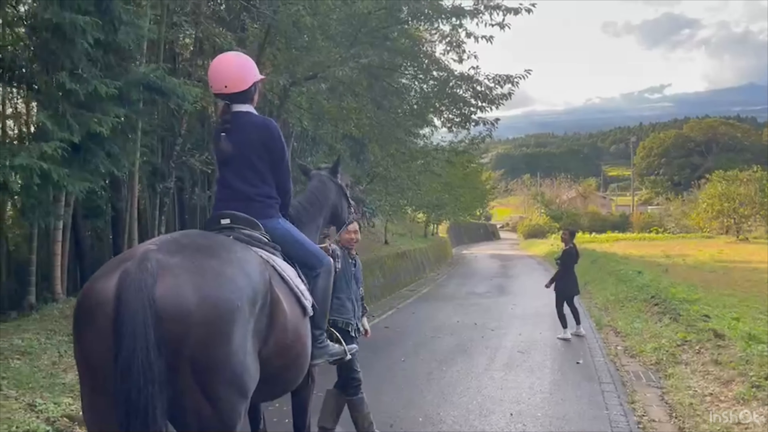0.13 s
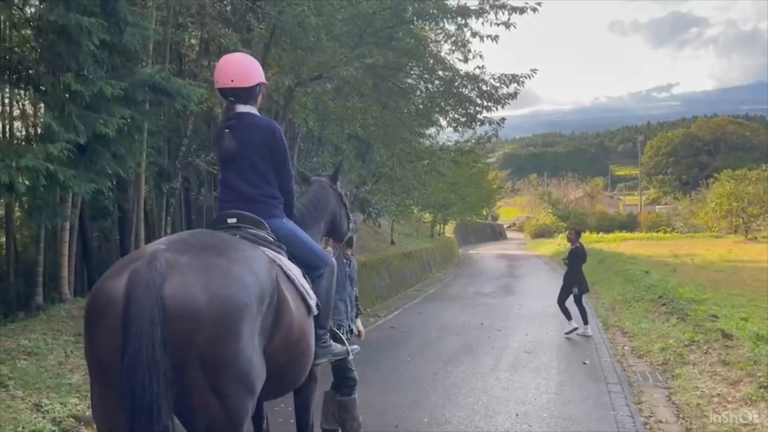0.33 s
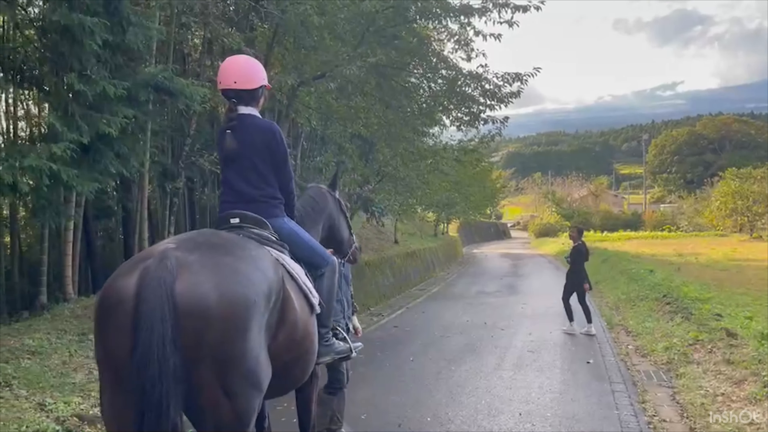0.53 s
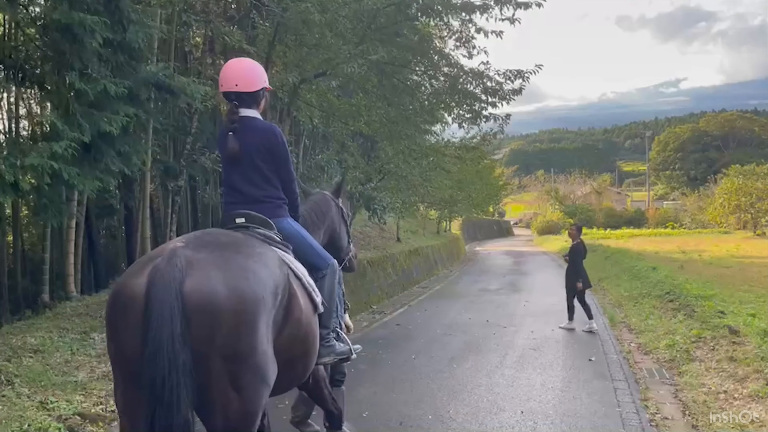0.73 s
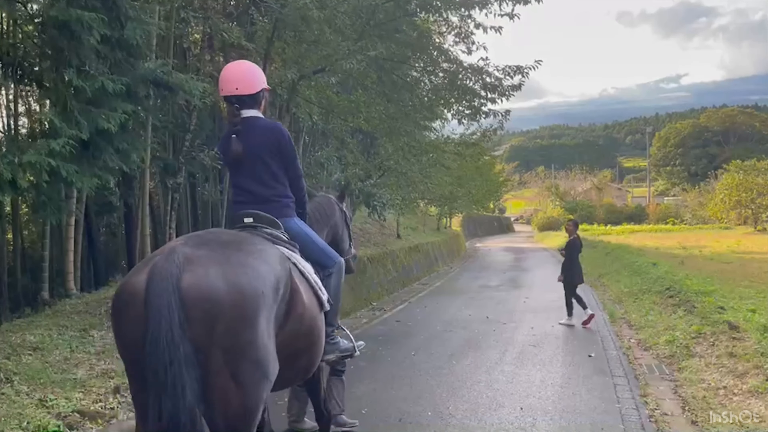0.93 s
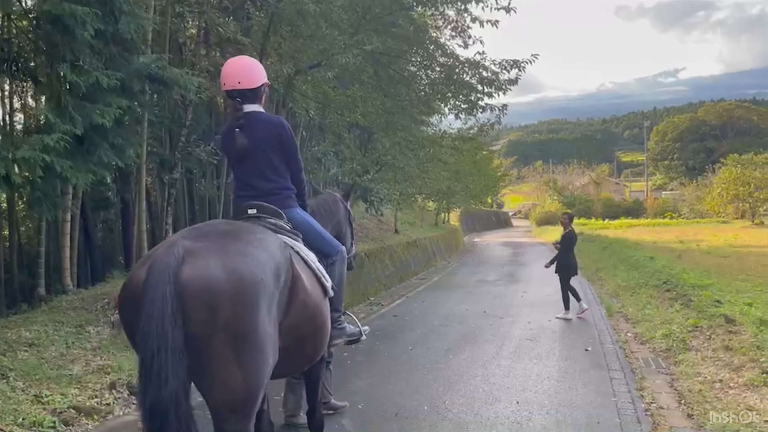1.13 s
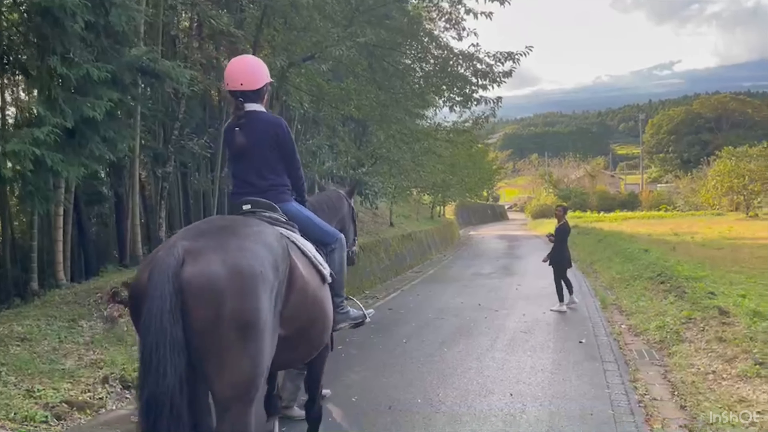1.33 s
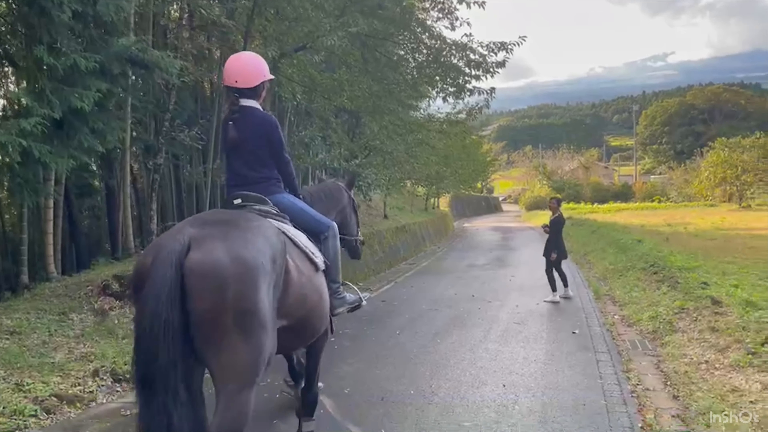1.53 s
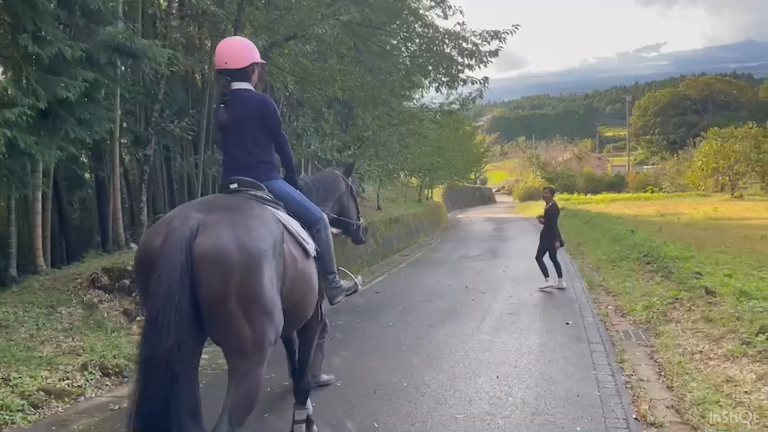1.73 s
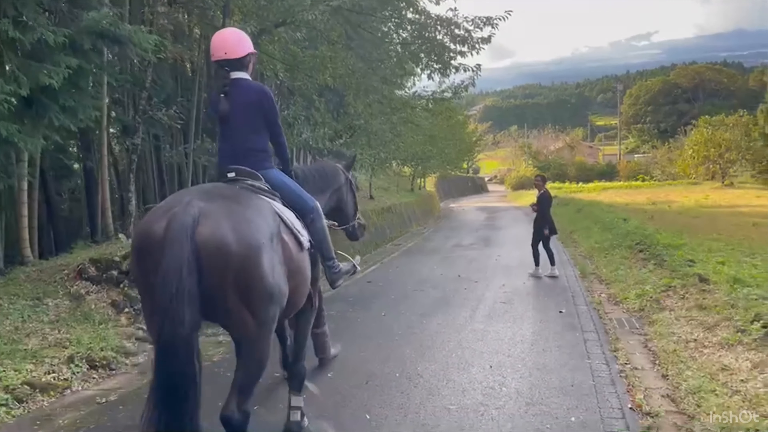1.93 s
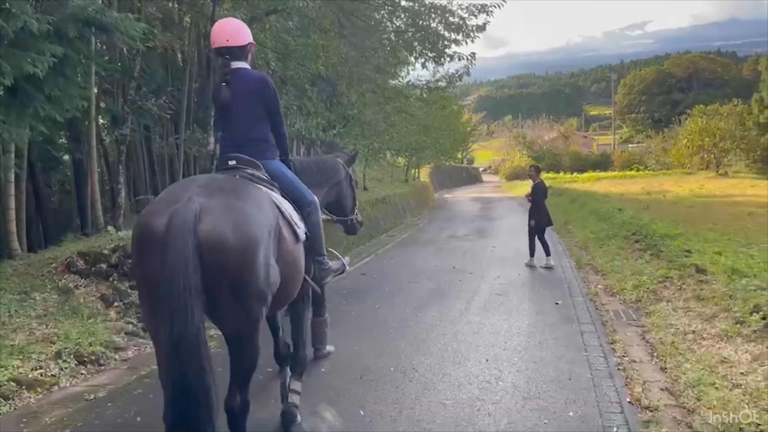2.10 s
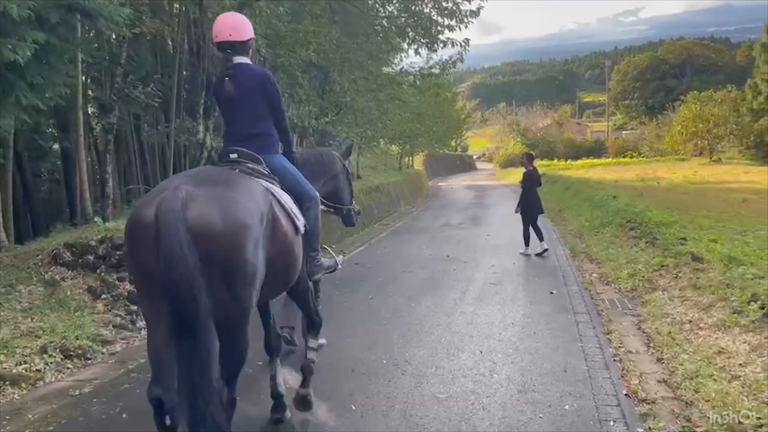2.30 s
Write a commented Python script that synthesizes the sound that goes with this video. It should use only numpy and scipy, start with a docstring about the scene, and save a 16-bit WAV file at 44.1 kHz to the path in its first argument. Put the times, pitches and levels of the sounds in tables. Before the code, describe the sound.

A shod horse walks on a wet paved road just ahead, slightly left: soft scuffs, then strong hollow clops, gritty clicks and a double-edged step; quiet low hum, thin birdlike whistle, close stereo microphone outdoors.

```python
"""Shod horse on a wet road

A horse walks a few metres ahead and left. Each hoof edge sums decaying clop modes, a sinking thud, a shoe snap,
crack and ring, and splash noise. Grit ticks are sines with noise; sole scuffs are grainy shaped noise.
A metal ring, thin chirp and airy two-strand whistle are tones blurred by narrow noise. Country hum, of
third-octave noise bands, runs throughout; a faint echo from trees follows the near sounds.
"""
import sys
import numpy as np
from scipy import signal
from scipy.fft import rfft, irfft
from scipy.io import wavfile
from scipy.ndimage import uniform_filter1d

SR = 44100
rng = np.random.default_rng(int(sys.argv[2]) if len(sys.argv) > 2 else 0)


def wav_out(sig):
    """Save sig, one row per channel (or a flat mono array), as 16-bit PCM at SR to the path in sys.argv[1]."""
    wavfile.write(sys.argv[1], SR, np.round(np.clip(np.atleast_2d(sig).T, -1, 1) * 32767).astype(np.int16))


def invert_db(level):
    """Linear amplitude ratio for a level in decibels (20 dB per decade), elementwise."""
    return 10 ** (np.asarray(level, dtype=float) / 20)


N = 104120
SIDES = np.array([[1], [-1]])  # left, right


def on_log(table, hz):
    """Interpolates a (frequency [Hz], value) table on a log frequency axis."""
    a = np.array(table, float)
    return np.interp(np.log(np.maximum(hz, 1)), np.log(a[:, 0]), a[:, 1])


def unit(x):
    """Scales to rms 1."""
    return x / np.sqrt(np.mean(x ** 2))


def shaped(gain):
    """Noise whose spectrum follows gain(Hz), rms 1."""
    spectrum = rfft(rng.standard_normal(N))
    return unit(irfft(spectrum * gain(np.fft.rfftfreq(N, 1 / SR)), N))


def bell(hz, width_hz):
    """Resonance curve as a function of frequency."""
    return lambda f: 1 / np.sqrt(1 + (2 * (f - hz) / width_hz) ** 4)


def walk(rate_hz):
    """Random levels held 1 / rate_hz s and slewed twice."""
    k = int(SR / rate_hz)
    held = np.repeat(rng.standard_normal(N // k + 1), k)
    return 1.94 * uniform_filter1d(uniform_filter1d(held, k), k)[:N]


def swell(t, rise_s, order=1):
    """Push that peaks after rise_s and dies away; a higher order starts softer."""
    u = np.maximum(t, 0) / rise_s
    return (u * np.exp(1 - u)) ** order


def add(out, at_s, x, pan_db):
    """Mixes a sound in at a time, left over right by pan_db."""
    i = int(at_s * SR)
    x = x[:N - i]
    out[:, i:i + len(x)] += x * invert_db(pan_db / 2 * SIDES)


def airy(width_hz):
    """Complex narrow noise about 0 Hz: turns a tone breathy when it modulates it."""
    return shaped(bell(0, width_hz)) + 1j * shaped(bell(0, width_hz))


def glide(table, carrier):
    """Moves a carrier along a (time [s], pitch [Hz], level [dB]) table with a wavering pitch."""
    t = np.arange(N) / SR
    s, hz, db = np.array(table).T
    waver_hz = 22 * walk(40)
    phase = 2 * np.pi * np.cumsum(np.interp(t, s, hz) + waver_hz) / SR
    level = invert_db(np.interp(t, s, db, left=-150, right=-150))
    return level * np.real(carrier * np.exp(1j * phase))


# swells of four hum ranges, used re the first row:
# (time [s], bass [dB], middle [dB], treble [dB], top [dB])
HUM_SWELLS = [(0.0, -54.5, -64, -77, -92.5), (0.18, -54.5, -59, -80, -95.5), (0.39, -59, -58.5, -77, -104),
              (0.52, -53.5, -60.5, -74, -99), (0.64, -57, -56.5, -78, -92.5),
              (0.83, -53.5, -57, -81.5, -103), (1.11, -57.5, -57, -79, -102),
              (1.43, -55.5, -55.5, -76.5, -99), (1.59, -56, -52.5, -77, -94),
              (1.71, -55, -50.5, -73.5, -98), (1.81, -51.5, -50.5, -71.5, -89),
              (2.02, -55.5, -50.5, -74.5, -94), (2.24, -54, -51, -70, -90), (2.36, -55.5, -54, -76.5, -96)]
# hum spectrum before trim: (frequency [Hz], density [dB per Hz])
HUM_SPECTRUM = [(25, -55), (45, -11.5), (66, 1.5), (99, -10), (156, -8), (281, -25), (509, -29),
                (1200, -31), (2060, -36), (3090, -35.5), (5730, -42), (7500, -58), (9000, -42.5),
                (12500, -54.5), (14000, -51), (16000, -62)]
# (frequency [Hz], likeness of the channels [0-1])
HUM_LIKENESS = [(30, .78), (120, .8), (300, .85), (1500, .6), (3000, .55), (6000, .9), (8000, .98),
                (12000, .98)]


def hum():
    """Distant hum and leaves: third-octave noise bands; bass, middle, treble and top swell on their own."""
    t, out = np.arange(N) / SR, 0
    s, *levels = np.array(HUM_SWELLS).T
    swells_db = np.array([np.interp(t, s, v) for v in levels])
    swells_db = swells_db - swells_db[:, :1]
    corners = np.log([120, 400, 1800, 3600, 6500, 10000])  # Hz, crossfades between ranges
    for hz in 28 * 2 ** (np.arange(28) / 3):
        share = np.array([np.interp(np.log(hz), corners, row[[0, 1, 1, 2, 2, 3]]) for row in np.eye(4)])
        band_db = on_log(HUM_SPECTRUM, hz) + 10 * np.log10(hz) - 75.5
        db = share @ swells_db + band_db + 1.98 * walk(7.946)
        alike = on_log(HUM_LIKENESS, hz)
        mid, side = (shaped(bell(hz, hz / 4)) for _ in range(2))
        stereo = np.sqrt(1 + alike) * mid + np.sqrt(1 - alike) * side * SIDES
        out = out + invert_db(db) * stereo * invert_db(0.8 * share[1] * SIDES)  # middle leans left
    return out


# (frequency at 0 s [Hz], level at 0 s [dB], t60 [s])
RING_MODES = [(3930, -79, 1.6), (4690, -73, 1.6), (5880, -75, 1.5), (7020, -79, 1.2)]


def metal_ring():
    """Fading metal modes, slightly noisy, sagging in pitch and stopped by stop_s."""
    t, out = np.arange(N) / SR, 0
    sag_per_s, stop_s = 0.1, 0.23
    damped = np.clip((stop_s - t) / 0.03, 0, 1)
    for hz, db, t60_s in RING_MODES:
        phase = 2 * np.pi * hz * (t - sag_per_s * t ** 2 / 2)
        mode = np.real((1 + 0.65 * airy(110)) * np.exp(1j * phase))
        out = out + invert_db(db - 60 * t / t60_s) * damped * mode
    return out


# (time [s], pitch [Hz], level [dB])
CHIRP_GLIDE = [(.25, 3150, -82), (.26, 3240, -66), (.28, 3500, -67), (.305, 3700, -62), (.326, 3670, -57),
               (.343, 3480, -59), (.354, 3180, -61), (.362, 3080, -85)]


def chirp():
    """Thin chirp: a gliding tone with a little narrow noise."""
    return glide(CHIRP_GLIDE, 1.1 + 0.42 * airy(300))


# grit, splash and shoe-nail ticks, level and treble before trim:
# (time [s], level [dB], frequency [Hz], treble re tick [dB], decay scale [ms])
GRIT_TICKS = [(0.349, -46, 3670, -10.5, 5.1), (0.3693, -42, 3680, -1, 4.7), (0.378, -42, 3770, -1, 3.5),
              (0.4454, -45, 3500, -11, 7.6), (0.6583, -38.5, 3770, -16, 3.3), (0.818, -53, 3460, -7, 6.4),
              (0.839, -55.5, 5100, 15, 4), (1.041, -71, 3270, 10, 2.4), (1.225, -35, 3240, -14.5, 6.7),
              (1.246, -41, 4920, -26, 3.5), (1.2624, -46, 3360, -17, 4.5), (1.5098, -44, 3420, -10, 2.5),
              (1.5587, -45, 3230, 1, 1.4), (1.6812, -35, 4040, -25, 3.6), (1.7502, -24.5, 5020, -40, 2.4),
              (1.7856, -17, 5110, -36, 3), (1.8448, -36.5, 4750, -14, 2.2), (1.9032, -30, 5100, -24.5, 2.4),
              (2.2816, -34, 3530, -23, 5.3)]


def grit():
    """Ticks of grit, water and shoe nails: short sines with two bands of noise."""
    out, t = np.zeros((2, N)), np.arange(2048) / SR
    top, wide = shaped(bell(10000, 6700)), shaped(bell(6700, 3300))
    for at_s, db, hz, top_db, decay_ms in GRIT_TICKS:
        i = int(at_s * SR)
        x = np.sin(2 * np.pi * hz * t)
        x += 0.5 * np.roll(wide, -i)[:len(t)]
        x += invert_db(top_db + 8.5) * np.roll(top, -i)[:len(t)]
        add(out, at_s, invert_db(db - 15.5) * swell(t, decay_ms / 3000) * x, pan_db=1.0)
    return out


# (start [s], length [s], level [dB])
SOLE_SCUFFS = [(0.358, 0.04, -53), (0.437, 0.19, -57), (0.657, 0.033, -77), (0.817, 0.046, -65.5),
               (0.861, 0.0089, -55), (0.897, 0.026, -53.5), (0.931, 0.017, -58), (1.082, 0.069, -67.5),
               (1.218, 0.042, -64.5), (1.597, 0.067, -65), (2.083, 0.054, -64), (2.223, 0.069, -68.5)]
# scuff spectrum, relative: (frequency [Hz], density [dB per Hz])
SCUFF_SPECTRUM = [(880, -49), (1500, -46), (1620, -33), (1920, 0), (3180, 9), (3990, 7), (5890, 11.5),
                  (11000, 6.5), (15500, -5)]


def scuffs():
    """Soles rub the road: shaped noise with a grainy random level under a rounded window."""
    out = np.zeros((2, N))
    rub = shaped(lambda f: invert_db(on_log(SCUFF_SPECTRUM, f)))
    rub = unit(rub * invert_db(1.55 * walk(250)))
    for at_s, length_s, db in SOLE_SCUFFS:
        n = int(length_s * SR)
        window = np.sqrt(np.hanning(n))
        add(out, at_s, invert_db(db) * window * rub[int(at_s * SR):][:n], pan_db=0.7)
    return out


# hoof contacts; crack and treble are base values that each layer offsets:
# (time [s], clop level [dB], clop [Hz], thud re clop [dB], settled thud [Hz], crack base re clop [dB],
# loudest shoe ring [Hz], treble base re clop [dB], left over right [dB], clop rise [ms])
HOOF_CONTACTS = [(0.458, -46.5, 1020, 2, 188, -11, 2220, -28, 2.5, 2.8),
                 (0.619, -49.5, 523, 3.5, 227, -5, 2740, -13, 3.5, 0.94),
                 (0.759, -60, 1030, -3, 328, -17, 2050, -34, 2.0, 2.8),
                 (0.872, -18.5, 1005, -7.5, 354, -11, 2324, -19.5, 2.5, 2.23),
                 (0.896, -37.5, 700, -31, 434, -14, 2520, -38, 3, 2.0),
                 (0.901, -31, 750, -10, 204, -10, 3470, -32, 2.5, 1.3),
                 (0.91, -30.5, 982, -30, 174, -9, 2400, -38, 3.5, 4.03),
                 (0.904, -35, 1090, -3, 489, -8.5, 2230, -34, 7, 2),
                 (0.917, -41, 967, -10, 208, -12, 2370, -31, -3, 2.2),
                 (0.942, -42, 990, 0, 166, -6, 2050, -19, 2, 0.8),
                 (0.949, -40, 960, -29, 446, -14, 3640, -10.5, 8.5, 1.31),
                 (0.956, -43.5, 764, 2, 279, -15, 2230, -40, 1.5, 1.95),
                 (1.072, -35.5, 730, -14, 269, -3, 2110, -1, 5, 0.78),
                 (1.23, -30, 937, -50, 443, -13.5, 2500, -22, 6.5, 1.01),
                 (1.237, -41, 1170, -34, 254, -5.5, 2400, -11, 6, 1.7),
                 (1.328, -17, 1050, -10, 252, -13.5, 2460, -47, 4.5, 1.28),
                 (1.3528, -18.5, 670, -34, 440, -18, 2170, -50, 4.5, 1.13),
                 (1.358, -28.5, 750, -6.5, 235, -29, 2080, -50, -1, 2.58),
                 (1.633, -44.5, 974, -6, 247, -14.5, 2000, -33, 4, 1.4),
                 (1.646, -40.5, 1070, -27, 402, -23, 2000, -46, 1, 2.9),
                 (1.655, -27, 724, -14, 280, -36, 2240, -52, 1.5, 2.53),
                 (1.66, -29, 900, -16, 342, -22, 1880, -55, 7, 2.53),
                 (1.673, -28, 706, -36, 437, -23.5, 2060, -49, 6, 2.4),
                 (1.68, -35.5, 430, 3.5, 214, -20, 2530, -36, 1.5, 1.62),
                 (1.7, -44, 670, -26, 172, -8, 2030, -44, 3, 2.6),
                 (1.727, -46.5, 670, 3, 370, -33, 3900, -40, -6, 2.35),
                 (1.749, -26.5, 1163, -1, 218, -21, 2800, -22, 4.5, 1.04),
                 (1.785, -29, 824, 2.5, 252, -14, 3250, -26, 4, 1.67),
                 (1.848, -48.5, 597, 8, 244, -12.5, 4540, -19, 2, 2.5),
                 (2.083, -24.5, 804, -19, 313, -13, 3550, -34, -1, 1.45),
                 (2.0865, -27.5, 1040, -12, 281, -13.5, 2360, -40, 6, 2.1),
                 (2.0955, -26, 740, -8, 251.7, -13.5, 2350, -42, 8.5, 1.82),
                 (2.1095, -27, 780, -13, 222, -16, 4350, -42, -2.5, 1.43),
                 (2.327, -72, 584, -7, 190, -15, 2380, -13, -9, 2.6)]
# noisy shoe resonances: (frequency [Hz], width [Hz], relative level [dB])
SHOE_MODES = [(2350, 550, 6), (3360, 690, -11), (4520, 710, 0.5), (5100, 250, 4), (6760, 420, -4)]


def hooves():
    """Three hollow modes clop, a late thud sinks in pitch, the shoe snaps, cracks and rings, water splashes."""
    lead_s = 0.002  # clop begins this long before contact
    out, t = np.zeros((2, N)), np.arange(4096) / SR - lead_s
    shoe = [invert_db(db) * shaped(bell(hz, width_hz)) for hz, width_hz, db in SHOE_MODES]
    wide, top, body = shaped(bell(1800, 5600)), shaped(bell(8350, 5000)), shaped(bell(620, 860))
    upper_ratio, upper_db, lower_ratio, lower_db = 1.222, -14, 0.654, -7
    thud_late_s, thud_rise_s, thud_glide, thud_glide_s = 0.0015, 0.0036, 1.1, 0.003
    snap_s = 0.00014
    late = t - 0.0002  # the shoe sounds just after contact

    for at_s, db, hz, thud_db, thud_hz, crack_db, ring_hz, top_db, pan_db, rise_ms in HOOF_CONTACTS:
        i, rise_s = int(at_s * SR), rise_ms / 1000

        def cut(noise):
            """Noise from this contact on."""
            return np.roll(noise, -i)[:len(t)]

        def tone(f):
            """Sine near its crest at the clop's peak, with a random slip."""
            slip_cycles = 0.3 * (rng.random() - 0.5)
            return np.sin(2 * np.pi * (f * (t - rise_s) + slip_cycles + 0.25))

        main = tone(hz)
        x = swell(t + lead_s, rise_s + lead_s, order=3) * (main + invert_db(upper_db) * tone(hz * upper_ratio))
        x += invert_db(lower_db) * swell(t, 0.94 * rise_s, order=2) * tone(hz * lower_ratio)
        x += invert_db(-37.5) * swell(t, rise_s=0.0023) * main

        thud_t = t - thud_late_s
        sinking_hz = thud_hz * (1 + thud_glide * np.exp(-np.maximum(thud_t, 0) / thud_glide_s))
        thud_cycles = np.cumsum(sinking_hz) / SR + rng.random()
        x += invert_db(thud_db) * swell(thud_t, thud_rise_s) * np.cos(2 * np.pi * thud_cycles)

        clang = sum(invert_db(3.7 * (rng.random() - 0.5)) * cut(mode) for mode in shoe)
        x += invert_db(crack_db - 12) * swell(late, rise_s=0.00075) * (clang + cut(wide))
        x += invert_db(crack_db - 0.5) * swell(late, rise_s=0.0011) * tone(ring_hz)
        # snap: slope of a very short push
        x += invert_db(crack_db + 2) * np.gradient(swell(late, snap_s, order=2)) * snap_s * SR
        # noisy tail
        x += invert_db(-13) * swell(t, rise_s=0.00305) * (cut(body) + invert_db(crack_db) * cut(wide))
        add(out, at_s - lead_s, invert_db(db) * x, pan_db)

        splash = invert_db(db + top_db + 8) * swell(late, rise_s=0.0003) * cut(top)
        add(out, at_s - lead_s, splash, pan_db=6 * (rng.random() - 0.5))
    return out


# lower strand: (time [s], pitch [Hz], level [dB])
WHISTLE_GLIDE = [(1.545, 3170, -85), (1.565, 3250, -66), (1.6, 3550, -70), (1.63, 3850, -70),
                 (1.66, 3990, -65), (1.78, 4030, -65), (1.83, 4080, -71), (1.89, 4190, -69),
                 (1.92, 4230, -64), (1.97, 4240, -62), (2.03, 4230, -60), (2.11, 4270, -61),
                 (2.17, 4160, -63), (2.2, 4040, -63), (2.215, 3680, -63), (2.232, 3450, -63),
                 (2.26, 3420, -68), (2.28, 3400, -85)]
# upper strand: (time [s], pitch [Hz], level [dB])
STRAND_GLIDE = [(1.73, 4350, -82), (1.77, 4350, -66), (1.83, 4450, -64), (1.885, 4410, -69),
                (1.94, 4500, -73), (1.98, 4600, -65), (2.05, 4550, -60), (2.09, 4470, -61),
                (2.13, 4400, -66), (2.16, 4350, -82)]


def whistle():
    """Airy two-strand whistle: tones with narrow noise and a random level on gliding pitches."""
    width_hz, air = 200, 0.62
    lower = (1 + air * airy(width_hz)) * invert_db(2.5 * walk(30))
    upper = (1 + 1.4 * air * airy(2 * width_hz)) * invert_db(2.5 * walk(30))
    return glide(WHISTLE_GLIDE, lower) + glide(STRAND_GLIDE, upper)


def tree_echo(near):
    """Faint echo from the trees: decaying, treble-softened noise as impulse response."""
    echo_db, t60_s, delay_s = -19.5, 0.32, 0.008
    t = np.arange(SR // 3) / SR
    trees = rng.standard_normal((2, len(t))) * invert_db(-60 * t / t60_s) * (t > delay_s)
    trees = trees / np.sqrt(np.sum(trees ** 2) / 2)
    trees = signal.lfilter([0.5], [1, -0.55], trees)
    return invert_db(echo_db) * signal.fftconvolve(near, trees, axes=1)[:, :N]


def scene():
    """Hum, tones set to the left, and near sounds with their echo."""
    tones = (metal_ring() + chirp() + whistle()) * invert_db(2.5 * SIDES)
    rumble_cut = signal.butter(2, 90, "high", fs=SR, output="sos")
    near = signal.sosfilt(rumble_cut, grit() + scuffs() + hooves())
    return hum() + tones + near + tree_echo(near)


def roll_off(x):
    """The treble ends steeply here."""
    return signal.sosfilt(signal.butter(12, 16440, fs=SR, output="sos"), x)


# (frequency [Hz], left phase lead [rad])
PORT_LEAD = [(20, 0), (300, .1), (1000, .5), (2200, .9), (4000, .7), (6300, 0), (7600, -2.7), (9300, -3.5),
             (10600, -6.0), (13000, -6.5), (14000, -9.0), (15000, -9.6), (16400, -10.4)]


def record(dry):
    """Two microphone ports shift the channels' phase against each other; the top is cut."""
    lead_rad = on_log(PORT_LEAD, np.fft.rfftfreq(N, 1 / SR))
    ports = irfft(rfft(dry) * np.exp(0.5j * lead_rad * SIDES), N)
    top_cut = signal.ellip(8, 0.2, 60, 16200, fs=SR, output="sos")
    mix = signal.sosfilt(top_cut, ports)
    return roll_off(mix)


dry = scene()
out = record(dry)
wav_out(out)
```